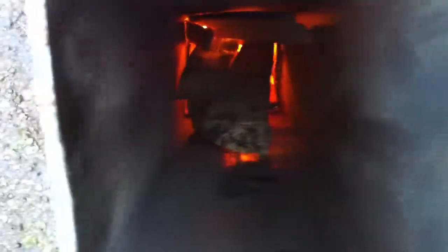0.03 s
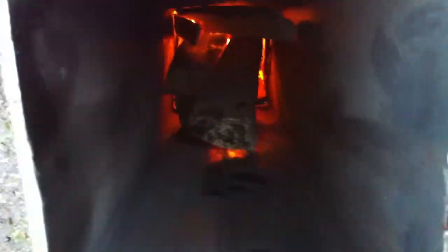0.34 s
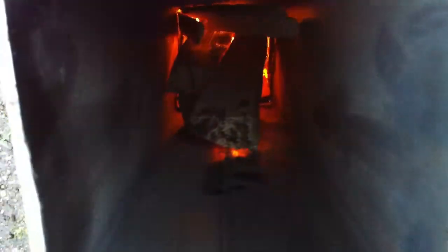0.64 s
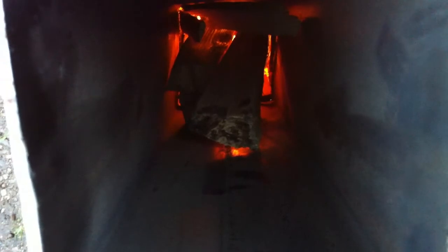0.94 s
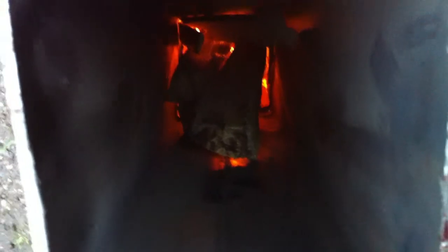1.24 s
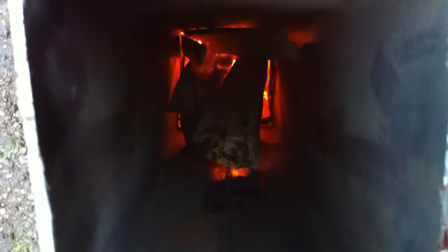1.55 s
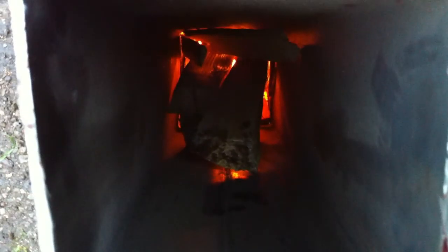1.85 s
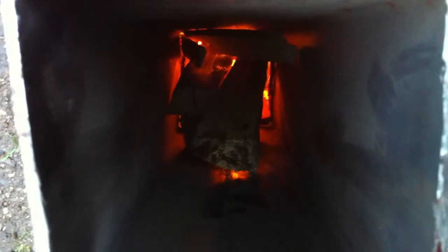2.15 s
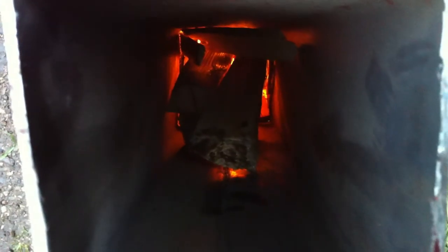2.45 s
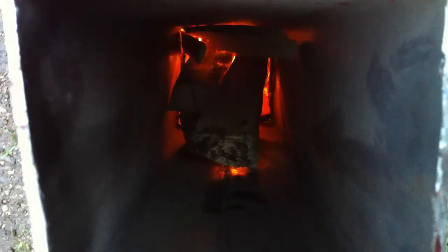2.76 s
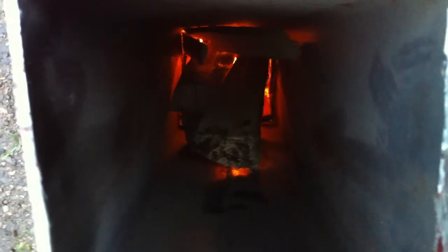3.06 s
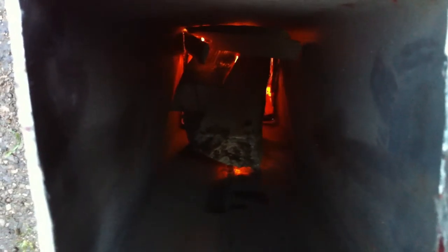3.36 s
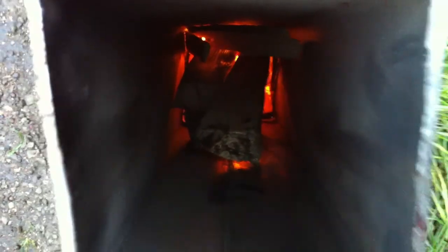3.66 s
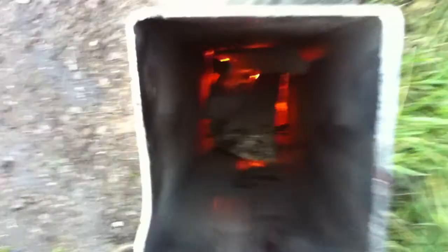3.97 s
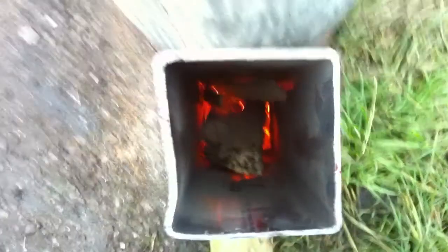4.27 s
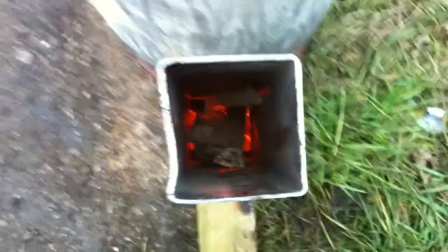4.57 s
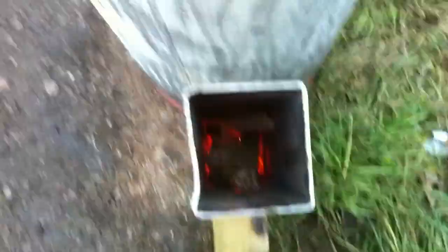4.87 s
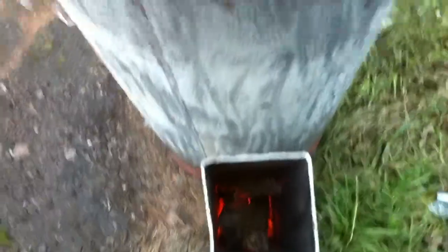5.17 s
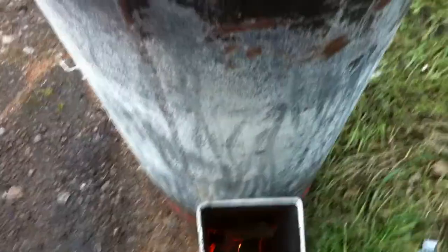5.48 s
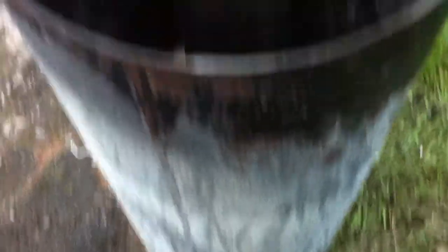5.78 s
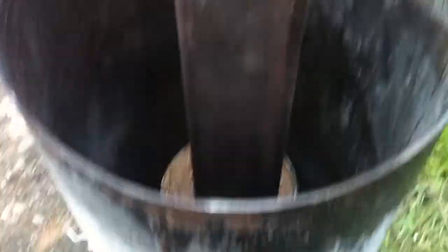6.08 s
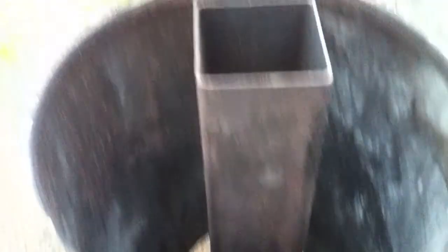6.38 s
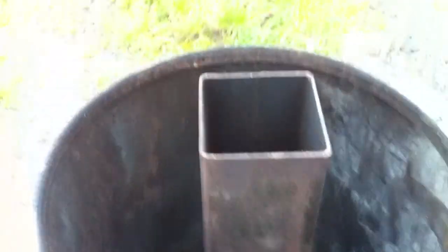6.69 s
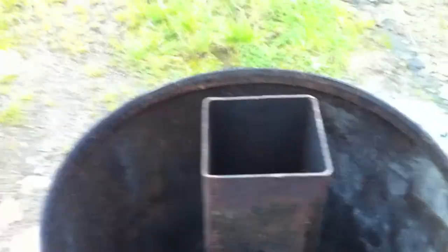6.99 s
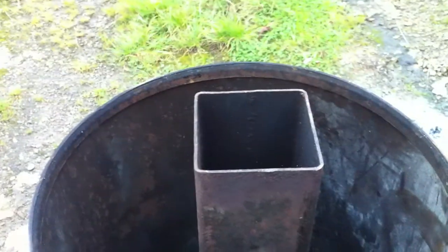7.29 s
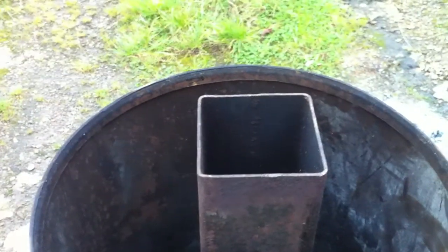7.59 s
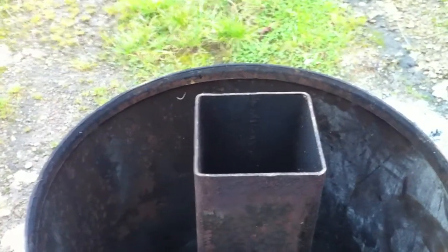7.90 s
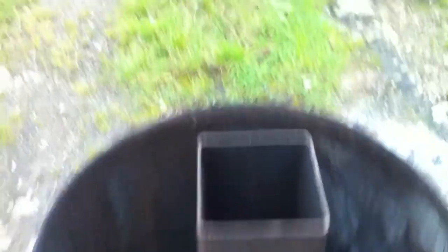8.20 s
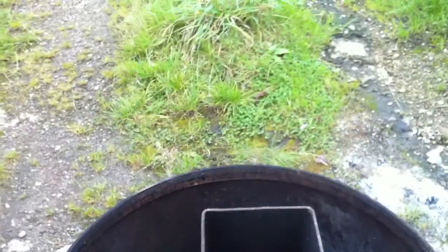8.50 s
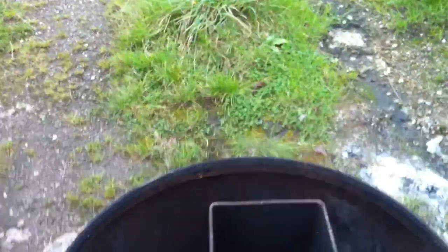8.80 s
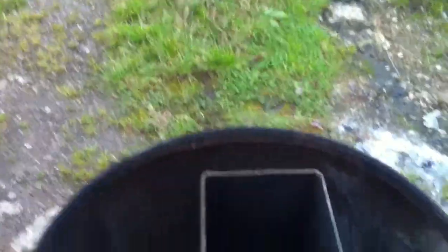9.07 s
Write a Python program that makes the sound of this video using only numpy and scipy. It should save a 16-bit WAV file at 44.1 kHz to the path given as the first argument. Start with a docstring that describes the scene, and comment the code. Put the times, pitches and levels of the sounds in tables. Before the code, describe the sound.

A wood fire crackles and pops sharply in a metal stove tube over a steady, low rushing draught outdoors.

```python
"""Rocket stove outdoors, close up

Wood burns in the square steel feed tube: the draught roars in the tube's air modes, gas puffs alight,
the hot wood hisses and sizzles, char ticks and steam pockets pop. One microphone starts in the feed
mouth, where gusts buffet it, then moves up past the barrel to the chimney. Grit scrunches underfoot
once on the way."""
import sys
import numpy as np
from scipy import signal
from scipy.fft import rfft, irfft, next_fast_len
from scipy.io import wavfile
from scipy.ndimage import uniform_filter1d, map_coordinates

SR = 44100
rng = np.random.default_rng(int(sys.argv[2]) if len(sys.argv) > 2 else 0)


def store_wav(level_fs):
    """Save 16-bit WAV to argv[1]."""
    pcm = np.round(np.clip(np.atleast_2d(level_fs), -1, 1) * 32767)
    wavfile.write(sys.argv[1], SR, pcm.T.astype(np.int16))


N = 402890
SAMPLES_PER_MS = SR / 1000

# Air modes of the feed tube and chimney. Each row: frequency in Hz, width in Hz, level in dB.
AIR_MODES = [(185.9, 19, 3.5), (317.4, 20.7, -7), (398.5, 17, -3), (615.7, 46, -1.5), (838, 31.5, -6),
             (1059, 54, -12), (1293, 46, -16)]
# The microphone's path. Each row: time in seconds, place (0 in the feed mouth, 1 above it,
# 2 beside the barrel, 3 over the chimney, 4 at its far rim).
MIC_PATH = [(0, 0), (3.65, .1), (4.0, .45), (4.3, 1), (4.55, 1.45), (5.0, 1.8), (5.8, 2.05), (6.4, 2.6),
            (6.9, 3), (8.1, 3.05), (8.6, 3.7), (9.14, 4)]


def amp(db):
    """Decibels to gain."""
    return 10 ** (np.asarray(db) / 20)


def unit(x):
    """Scale to rms 1."""
    return x / np.sqrt(np.mean(x ** 2) + 1e-20)


def burst(x):
    """Scale to the energy of 1 ms at rms 1."""
    return x * np.sqrt(SAMPLES_PER_MS / (np.sum(x ** 2) + 1e-20))


def curves(rows):
    """One value per sample for each column after the time."""
    times, *columns = np.transpose(rows)
    return [np.interp(np.arange(N) / SR, times, column) for column in columns]


def wobble(rate):
    """A smooth random curve, rate knots a second."""
    grid = np.arange(0, N, SAMPLES_PER_MS)
    knots = rng.standard_normal(int(N * rate / SR) + 4)
    return np.interp(np.arange(N), grid, map_coordinates(knots, [grid * rate / SR]))


def filtered(x, response):
    """x through a complex response of frequency."""
    size = next_fast_len(len(x) + 8192)
    return irfft(rfft(x, size) * response(np.fft.rfftfreq(size, 1 / SR)), size)[:len(x)]


def coloured(x, spectrum):
    """x shaped by (Hz, dB) points on a log axis."""
    points_hz, db = np.transpose(spectrum)
    return filtered(x, lambda hz: amp(np.interp(np.log(hz + 1), np.log(points_hz), db)))


def rush(spectrum):
    """Coloured noise of rms 1."""
    return unit(coloured(rng.standard_normal(N), spectrum))


def band(x, lo_hz, hi_hz, order=2):
    """Causal band-pass."""
    edges_hz = [lo_hz, min(hi_hz, SR / 2 - 100)]
    return signal.sosfilt(signal.butter(order, edges_hz, 'band', fs=SR, output='sos'), x)


def ring(x, modes):
    """x through damped resonances (Hz, width Hz, dB)."""
    return filtered(x, lambda f: sum(amp(db) * 1j * f * width / (hz * hz - f * f + 1j * f * width)
                                     for hz, width, db in modes))


def favouring(modes, pitch_hz, db_per_octave=11):
    """The modes, weaker the further they lie from a pitch."""
    return [(hz, width, db - db_per_octave * abs(np.log2(hz / pitch_hz))) for hz, width, db in modes]


def add(track, start, sound):
    """Mix a sound in at start seconds."""
    part = track[max(0, round(start * SR)):][:len(sound)]
    part += sound[:len(part)]


def fracture(tear_s, scatter_db, scatter_t60, tail_db, tail_t60):
    """A brief broadband tear scatters between the steel walls, then lingers in the tube."""
    t = np.arange(SR // 8) / SR
    tear = np.exp(-(t / tear_s) ** 2)
    scatter = amp(scatter_db - 60 * t / scatter_t60)
    tail = amp(tail_db - 60 * t / tail_t60)
    envelope = np.sqrt(tear ** 2 + scatter ** 2 + tail ** 2)
    spectrum = rfft(envelope * rng.choice([-1, 1], len(t)))
    flattened = spectrum / np.sqrt(uniform_filter1d(abs(spectrum) ** 2, size=200))
    fade = np.minimum(1, 2 * (1 - t / t[-1]))
    return irfft(flattened, len(t)) * fade


def open_air(level_db):
    """The soft outdoor background, wavering a little."""
    # The air around the stove. Each row: frequency in Hz, level in dB.
    spectrum = [(40, -6), (100, -10), (300, 6), (480, 2.5), (750, 0.5), (1100, -1), (1500, -6.5),
                (2200, -13), (4000, -39), (10000, -52)]
    return amp(level_db + 0.47 * wobble(14)) * rush(spectrum)


def gust_strength():
    """Wind strength in dB: each gust rises quickly, holds and dies away."""
    # Gusts at the microphone. Each row: start in seconds, hold in seconds, level in dB.
    gusts = [(1.949, 0.041, -36), (2.183, 0.15, -35.5), (2.41, 0.098, -45), (2.668, 0.038, -46.5),
             (3.34, 0.04, -71), (4.12, 0.19, -51)]
    rise_db_per_s, fall_db_per_s = 450, 100
    t = np.arange(N) / SR
    return np.max([db - rise_db_per_s * np.maximum(start - t, 0)
                   - fall_db_per_s * np.maximum(t - start - hold, 0)
                   for start, hold, db in gusts], axis=0)


def wind(gust_db):
    """Gusts right on the microphone: lumpy turbulence, and single eddies that thump for a cycle or so."""
    # The turbulence. Each row: frequency in Hz, level in dB.
    spectrum = [(10, -40), (50, 0), (90, 2.5), (160, 6.5), (300, -1.5), (450, -12.5), (700, -18.5),
                (1500, -37)]
    # The strongest eddies. Each row: time in seconds, relative peak in dB, centre in Hz.
    eddies = [(1.9835, -47, 560), (1.987, -21.5, 276), (2.048, -26, 210), (2.143, -23, 191),
              (2.184, -38, 480), (2.201, -25.5, 192), (2.238, -18, 310), (2.28, -23.5, 264),
              (2.316, -17.5, 244), (2.339, -24.5, 243), (2.665, -29, 220), (3.35, -29, 162),
              (4.396, -35, 197)]
    lumps = amp(1.8 * wobble(45))
    out = amp(gust_db) * lumps * rush(spectrum)
    t = np.arange(-SR // 50, SR // 50) / SR
    for when, db, hz in eddies:
        swing = np.sin(2 * np.pi * hz * t + rng.uniform(0, 2 * np.pi))
        eddy = swing / (1 + (t * hz / 0.43) ** 2) ** 1.4
        add(out, when + t[0], amp(db + 1.5) * eddy)
    return band(out, 115, 1800)


def scrunch():
    """Grit underfoot gives way in quick slips, each a dying shower of grains that fizz and ring."""
    # The slips. Each row: start in seconds, level in dB, time to fall 60 dB in seconds.
    slips = [(5.5736, -46, 0.039), (5.578, -55, .05), (5.587, -48, 0.075), (5.597, -57, .05),
             (5.604, -50, .06), (5.6148, -47, 0.057), (5.624, -49, 0.05), (5.634, -55.5, .1)]
    # The fizz of the grains. Each row: frequency in Hz, level in dB.
    fizz = [(800, -19), (1500, -11), (3000, -7), (4400, -1), (6500, -5), (9000, -1), (12800, 4),
            (16000, -16)]
    # Resonances of the grit. Each row: frequency in Hz, width in Hz, level in dB.
    grit_modes = [(2070, 320, 1), (3950, 400, -2), (4650, 350, -7)]
    out = np.zeros(N)
    t = np.arange(SR // 6) / SR
    for start, db, t60 in slips:
        grains = rng.choice([-1, 1], len(t)) * (rng.random(len(t)) < .3)
        shower = unit(coloured(grains, fizz)) + amp(-2) * unit(ring(grains, grit_modes))
        add(out, start, amp(db - 60 * t / t60) * shower)
    return out


def sliding_band(rows, width_hz):
    """A narrow, sputtering band of hiss whose centre and level follow a curve."""
    centre_hz, db = curves(rows)
    a, b = (filtered(rng.standard_normal(N), lambda hz: 1 / (1 + (hz / width_hz) ** 2))
            for _ in range(2))
    phase = 2 * np.pi * np.cumsum(centre_hz) / SR
    sputter = amp(wobble(9) + 2.5 * wobble(110))
    return amp(db) * unit(sputter * (a * np.cos(phase) + b * np.sin(phase)))


def hiss(level_db, chimney_db):
    """Gas escapes from hot wood; the tube colours it differently as the microphone moves along."""
    # The hiss from four places on the path. Each row: frequency in Hz, level in dB.
    in_mouth = [(300, -58), (800, 4.5), (1400, -4), (1750, 6.5), (2650, 6), (3300, 1), (3900, -10.5),
                (4500, -5), (5100, -8), (6000, 7), (6700, 0.5), (7400, 1.5), (8100, -4.5), (16000, -3)]
    above_mouth = [(300, -58), (800, 1.5), (1500, -4), (2700, 0), (3500, -2.5), (4200, -11), (4800, -17),
                   (6000, -16), (8000, -14), (9700, -7), (11400, -15), (13000, -11), (16000, -22)]
    beside_barrel = [(500, -31), (1500, 2), (2100, 5.5), (3300, 2), (4300, 2), (5200, 0.5), (6000, 0),
                     (6800, -3.5), (8200, -8), (11200, 2.5), (12500, 0), (14000, -4), (16000, -3.5)]
    over_chimney = [(500, -35), (1500, 15.5), (2800, 10), (4400, 9.5), (5400, 4), (7000, 3), (9500, 5.5),
                    (11600, 3.5), (13000, 2.5), (16000, 2)]
    # Cross modes of the chimney. Each row: frequency in Hz, width in Hz, level in dB.
    chimney_modes = [(2310, 55, 5), (3300, 90, -1), (4630, 200, -24)]
    # Two narrow bands that swell and slide as the microphone passes the stove.
    # Each row: time in seconds, centre in Hz, level in dB.
    lower_band = [(4.7, 5580, -102), (5.0, 5930, -70), (5.3, 6080, -74), (5.9, 5960, -72.5),
                  (6.2, 6350, -90), (6.6, 6250, -105)]
    upper_band = [(3.7, 11500, -91), (4.3, 11000, -70), (4.8, 11200, -74), (5.25, 11000, -76),
                  (5.8, 10500, -82), (6.3, 10800, -73), (6.9, 11750, -77), (7.8, 11350, -76),
                  (8.4, 11400, -86), (9.14, 10900, -74)]
    colours = [in_mouth, above_mouth, beside_barrel, over_chimney]
    place = np.minimum(curves(MIC_PATH)[0], len(colours) - 1)
    gas = np.zeros(N)
    for k, spectrum in enumerate(colours):
        nearness = np.maximum(1 - abs(place - k), 0)
        gas += np.sqrt(nearness) * rush(spectrum)
    hollow = amp(chimney_db) * unit(band(ring(rng.standard_normal(N), chimney_modes), 2000, 5000))
    gas *= amp(level_db + 0.56 * wobble(25))
    return gas + hollow + sliding_band(lower_band, width_hz=450) + sliding_band(upper_band, width_hz=700)


def sizzle(hiss_db, bursts_per_s=97, spread_db=11, t60=0.014):
    """Sap boils off in a dense spray of tiny bright bursts, just under the hiss."""
    onsets = rng.random(N) < bursts_per_s / SR
    sizes = amp(spread_db * np.clip(rng.standard_normal(N), -2, 2))
    decay = amp(-60 * np.arange(SR // 50) / SR / t60)
    spray = signal.fftconvolve(onsets * sizes, decay)[:N] * rng.standard_normal(N)
    return amp(hiss_db - 12.5) * unit(band(spray, 4300, 20000))


def puffs(small_db, small_count=16, spread_db=2):
    """Gas pockets ignite with a hollow knock and a thud of the tube's air; small ones come at random."""
    # The larger pockets. Each row: start in seconds, relative level in dB, thud against knock in dB.
    large = [(0.487, -34.5, 0), (0.651, -37, -11), (0.785, -42, 13), (1.286, -37, -9), (2.903, -43, 8),
             (2.989, -36, -10), (3.221, -43, -1), (3.798, -38.5, -10), (4.644, -33.5, 6.5), (7.413, -39, 1)]
    small = [(when * N / SR, small_db[int(when * N)] + spread_db * size, -10)
             for when, size in rng.random((small_count, 2))]
    out = np.zeros(N)
    for start, db, thud_db in list(large) + small:
        flare = fracture(.0013, -6, .03, -35, .08)
        knock = burst(band(ring(flare, AIR_MODES), 347, 1400)) + amp(-9) * burst(band(flare, 370, 2600))
        thud = band(ring(flare, AIR_MODES[:3]), 130, 480)
        add(out, start, amp(db - 0.5) * (burst(knock) + amp(thud_db) * burst(thud)))
    return out


def draught(low_db, upper_db, lead_db, rumble_db, gust_db):
    """Turbulent flames drive the tube's air modes in surges over a rumble; gusts fan the upper modes."""
    # The rumble of the flames. Each row: frequency in Hz, level in dB.
    rumble = [(20, -37), (45, -32), (70, -16), (100, -9.5), (140, 3.5), (230, -0.5), (340, -11.5),
              (470, -25), (800, -31), (2000, -62)]
    flutter = wobble(12)
    first, second, third = (ring(rng.standard_normal(N), [mode]) for mode in AIR_MODES[:3])
    pipe = band(first + amp(lead_db / 2) * second + amp(-lead_db / 2) * third, 89, 1900)
    low = unit(pipe) + amp(rumble_db) * rush(rumble)
    low = unit(band(low, 33, 454, order=4))
    upper = unit(band(ring(rng.standard_normal(N), AIR_MODES[3:]), 560, 1500, order=3))
    flicker = amp(1.2 * flutter + 2.2 * wobble(40))
    surges = unit(amp(1.3 * flutter + 1.9 * wobble(26)))
    upper_gain = np.hypot(amp(upper_db), amp(gust_db - 31))
    return amp(low_db) * surges * low + upper_gain * flicker * upper


def tick(centre_hz, knock_db, modes):
    """One small crack in the char, with a knock that rings the modes in a new balance each time."""
    split = fracture(.0006, -9, .02, -27, .045)
    struck = [(hz * rng.uniform(.96, 1.04), width * 1.5, db + rng.normal(0, 4))
              for hz, width, db in modes]
    crack = band(split, centre_hz * 0.66, centre_hz * 1.3)
    return burst(crack) + amp(knock_db) * burst(ring(split, struck))


def crackle(hiss_db, faint_count=50, spread_db=14.5, low_hz=7000, high_hz=12000):
    """Char cracks in clear ticks, and in faint random ones that just rise out of the hiss."""
    # Clear ticks. Each row: start in seconds, relative level in dB, centre in Hz, knock against it in dB.
    clear_ticks = [(0.079, -39.5, 7300, -5), (0.088, -38, 7760, -16), (0.099, -43, 9000, -14),
                   (0.113, -44, 8500, -12), (0.247, -49, 10000, -14), (0.6, -32.5, 8300, -18),
                   (0.608, -39, 9000, -6), (0.6528, -28.5, 9600, -18), (0.6763, -26.5, 8000, -7),
                   (0.725, -41, 8800, -20), (0.997, -41, 11500, -14), (1.079, -43, 10500, -14),
                   (1.117, -42, 10000, -12), (1.137, -37, 7050, -13), (1.712, -43, 7900, -3),
                   (1.905, -40, 10500, -16), (1.944, -36, 10100, -8), (2.036, -40.5, 11500, -16),
                   (2.057, -43, 6500, -12), (2.1406, -39.5, 9500, -16), (2.249, -43, 11500, -16),
                   (2.905, -37, 8340, -8), (2.968, -41, 6500, -19), (2.99, -36, 9800, -2),
                   (3.04, -39, 7500, -7), (3.438, -41, 11900, -16), (3.5955, -35.5, 9400, -5),
                   (3.755, -41.5, 9500, -14), (3.8, -43, 8500, -14), (4.061, -39, 8650, -6),
                   (4.3883, -31, 11500, -13), (4.6563, -35, 10800, -12), (5.002, -46, 10000, -4),
                   (5.023, -36, 12300, -10.5), (5.099, -36.5, 13200, -16), (5.168, -45, 11500, -19),
                   (5.269, -43, 3000, -15), (5.677, -50, 9500, -14), (5.7235, -45, 9900, -12),
                   (5.867, -49.5, 6500, -1), (6.676, -53.5, 10000, 2), (6.8597, -35, 9800, -8),
                   (7.55, -45, 10500, -14), (7.661, -50, 10000, -10), (7.7417, -48, 12150, -18),
                   (8.101, -43, 12400, -13), (8.109, -48, 11000, -7), (8.179, -52, 11000, -8),
                   (8.206, -62, 5000, 4), (8.4952, -48, 9300, -6), (8.774, -53, 10100, -10),
                   (9.008, -61, 4700, 6)]
    # What a tick rings: the square tube's cross modes, or the chimney when heard from over it.
    # Each row: frequency in Hz, width in Hz, level in dB.
    cross_modes = [(1703, 110, -1), (2410, 190, 3), (3220, 200, 2), (4440, 220, -8)]
    chimney_ping = [(2250, 110, -15), (3250, 130, 0), (4720, 170, 6)]
    out = np.zeros(N)
    place, = curves(MIC_PATH)
    for start, db, centre_hz, knock_db in clear_ticks:
        modes = chimney_ping if place[round(start * SR)] > 3 else cross_modes
        add(out, start, amp(db - 3.5) * tick(centre_hz, knock_db, modes))
    for when, size, pitch in rng.random((faint_count, 3)):
        i = int(when * N)
        db = hiss_db[i] - 3 + spread_db * size ** 2  # the smallest are the most common
        centre_hz = low_hz + (high_hz - low_hz) * pitch
        add(out, i / SR, amp(db) * tick(centre_hz, knock_db=-19, modes=cross_modes))
    return out


def pops(lead_db, linger_t60=0.064):
    """Steam pockets burst, and one late gas puff knocks much alike: a bright crack, the log's snap and knock, a
    steely ring, a push on the air."""
    # The steam pockets, and at 7.75 s a gas puff with a sharper knock. Each row: start and tearing time in
    # seconds; levels of tube air, wood, steel, snap # and crack in dB; pitches of wood, steel, snap and crack
    # in Hz; the crack's tail in dB.
    bursts = [(1.3296, 0.00018, -37, -50, -30, -25.5, -15, 1300, 2550, 5770, 9800, -42),
              (2.4019, 0.001, -20.5, -21.5, -28, -22, -17.5, 1370, 2500, 7000, 10800, -41),
              (4.606, 0.00015, -21.5, -28, -28, -23.5, -18.5, 1500, 2960, 3720, 10260, -48),
              (5.4406, 0.0007, -33, -36.5, -37.5, -21.5, -16.5, 1150, 2470, 5760, 10800, -37),
              (6.558, 0.0014, -38.5, -39, -40.5, -39, -29, 1240, 2740, 4200, 10100, -24),
              (6.7931, 0.00015, -32, -35, -34, -27.5, -18, 1240, 2600, 4370, 10500, -51),
              (7.2067, 0.00044, -26, -21, -23.5, -21.5, -15, 1850, 3400, 4120, 10900, -35),
              (7.7463, .002, -38.5, -48.5, -55, -66, -63, 1300, 2500, 6000, 11500, -28),
              (8.1307, 0.0011, -49, -56, -55, -51, -52, 1900, 3500, 4570, 10000, -25)]
    # The tube's higher lengthwise air modes, and what rings on in its steel.
    # Each row: frequency in Hz, width in Hz, level in dB.
    pipe_modes = [(1096, 45, 2), (1284, 96, 2), (1427, 51, -4), (1647, 71, 4), (2167, 78, -2)]
    steel_modes = [(1840, 48, -6), (2436, 104, 11.5), (2734, 47, 9), (3170, 240, 11.5), (3630, 140, -17),
                   (4280, 200, 3)]
    out = np.zeros(N)
    t = np.arange(SR // 8) / SR
    push = np.exp(-t / .0001)
    for (start, tear_s, tube_db, wood_db, steel_db, snap_db, crack_db,
         wood_hz, steel_hz, snap_hz, crack_hz, tail_db) in bursts:
        crack = band(fracture(tear_s, -14, .018, tail_db, .07), crack_hz * .78, crack_hz * 1.26, order=3)
        snap = band(fracture(tear_s, -13, .022, -29, .1), snap_hz * .78, snap_hz * 1.22, order=3)
        # the knock scatters among the sticks and rings along the tube like a pipe
        knock = band(fracture(tear_s, -9, .025, -22, linger_t60), wood_hz * .65, wood_hz * 2, order=3)
        pipe = band(ring(push, favouring(pipe_modes, wood_hz)), 800, 2800)
        wood = burst(pipe) + amp(-3) * burst(knock)
        steel = ring(fracture(tear_s, -16, .02, -29, linger_t60), favouring(steel_modes, steel_hz))
        # the push runs up and down the tube; the microphone's place tips the second mode against the third
        lead = lead_db[round(start * SR)]
        modes = np.array(AIR_MODES[:5])
        modes[:, 2] += [1, lead / 2, 4 - lead / 2, 2, 0]
        scattered = band(fracture(tear_s, 0, .06, -21, .12), 280, 1060)
        hollow = burst(band(ring(push, modes), 130, 1300)) + amp(-7.5) * burst(scattered)
        thump = band(push, 60, 330, order=1)
        for db, part in [(crack_db, crack), (snap_db, snap), (wood_db, wood), (steel_db, steel),
                         (tube_db, hollow), (tube_db - 13.5, thump)]:
            add(out, start, amp(db) * burst(part))
    return out


def scene():
    """The stove and its surroundings at one close, moving microphone."""
    # What reaches places 0 to 4. Each row, all in dB: low roar, upper air modes, small puffs, hiss,
    # outdoor air, chimney ring, lead of the second air mode over the third, rumble against the low modes.
    place_levels = [(-51, -63, -43.5, -55, -63.5, -81, 12, -5.5),
                    (-50.5, -67, -49, -60.5, -77, -97, -1, -4.5),
                    (-53.5, -66.5, -50, -64, -59, -85, -4, -10.5),
                    (-53.5, -64.5, -52, -65.5, -61.5, -82, 0, -6),
                    (-57.5, -84, -57, -65.5, -59.5, -69, 8, -4)]
    # How hard the fire draws. Each row: time in seconds, strength in dB.
    fire_draw = [(0, 2), (0.36, 0.5), (0.76, 5.5), (1.05, -0.5), (1.42, 9), (1.72, 2.5), (2.5, 2),
                 (2.78, -18), (2.94, 3.5), (3.45, 6.5), (3.85, 4), (4.4, -1), (5.15, 0.5), (5.5, 5),
                 (7.1, 1.5), (7.75, 0.5), (8.4, 4), (9.14, 4)]
    place, = curves(MIC_PATH)
    roar_db, upper_db, puff_db, hiss_db, air_db, chimney_db, lead_db, rumble_db = (
        np.interp(place, np.arange(len(place_levels)), column) for column in np.transpose(place_levels))
    draw_db, = curves(fire_draw)
    gust_db = gust_strength()
    flames = draught(roar_db + 0.29 * draw_db, upper_db + draw_db, lead_db, rumble_db, gust_db)
    flames += puffs(puff_db + draw_db)
    wood = hiss(hiss_db, chimney_db) + sizzle(hiss_db) + pops(lead_db) + crackle(hiss_db)
    return (flames + wood + open_air(air_db) + wind(gust_db) + scrunch())[None]


def record(dry):
    """The microphone sheds deep bass and keeps nothing above its band limit."""
    low_cut_hz, top_hz = 55, 15950
    top = lambda hz: 1 / (1 + (hz / top_hz) ** 160)
    response = lambda hz: top(hz) * 1j * hz / (low_cut_hz + 1j * hz)
    return np.array([filtered(channel, response) for channel in dry])


dry = scene()
out = record(dry)
store_wav(out)
```